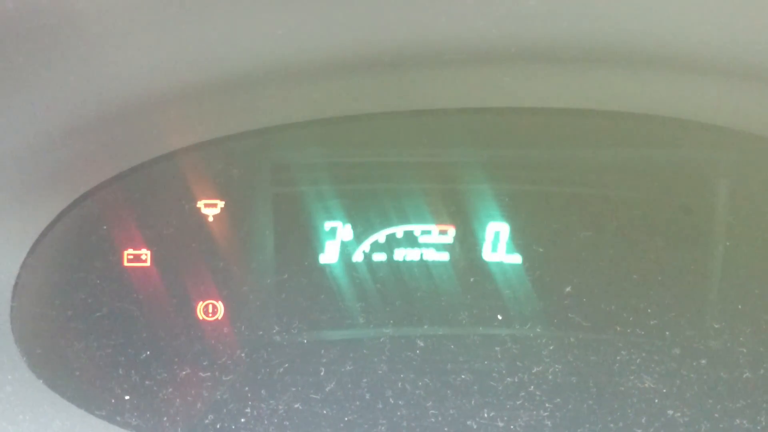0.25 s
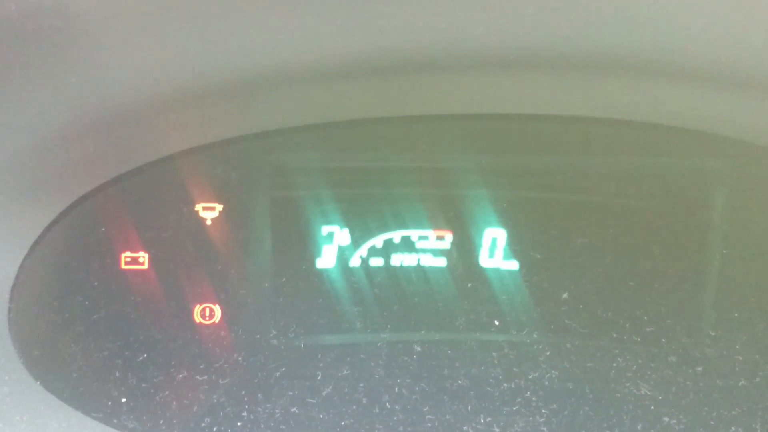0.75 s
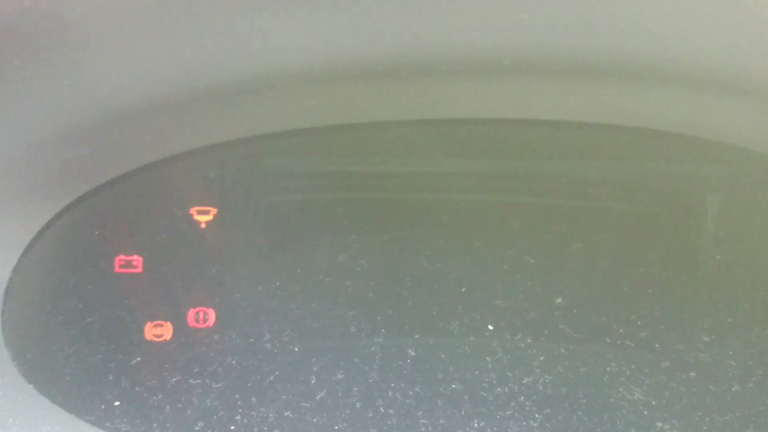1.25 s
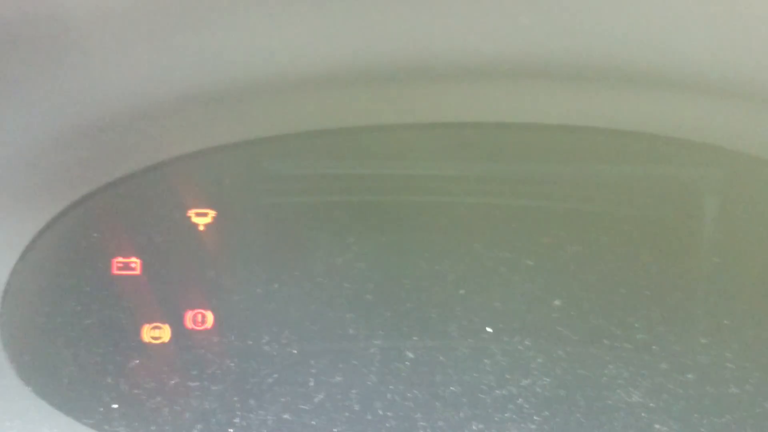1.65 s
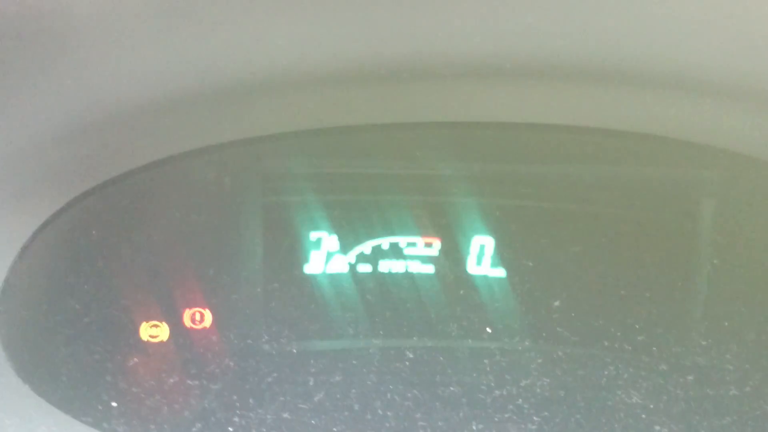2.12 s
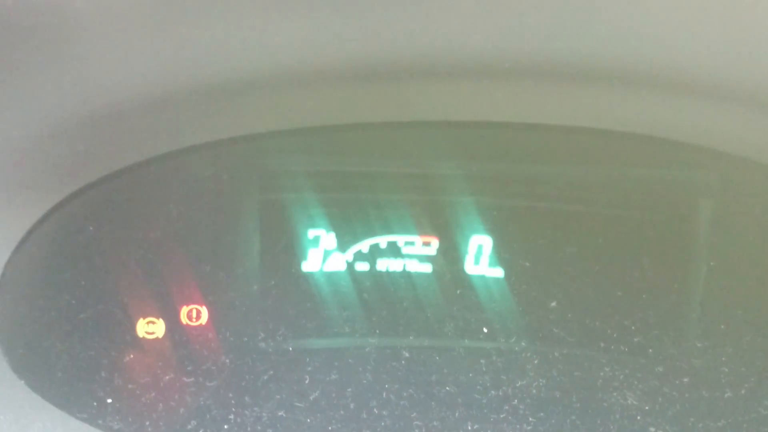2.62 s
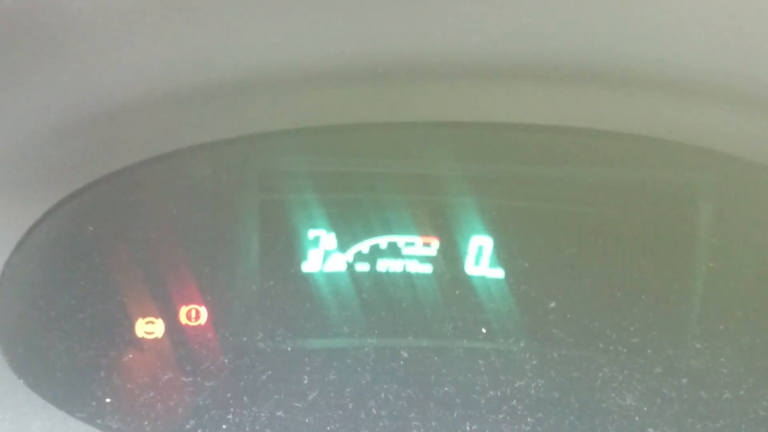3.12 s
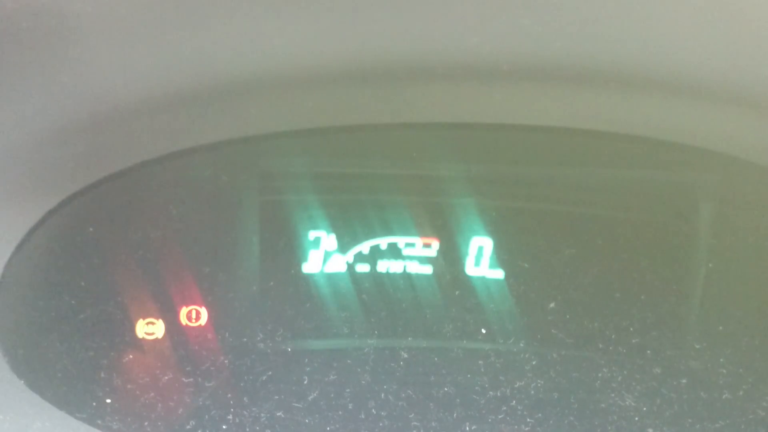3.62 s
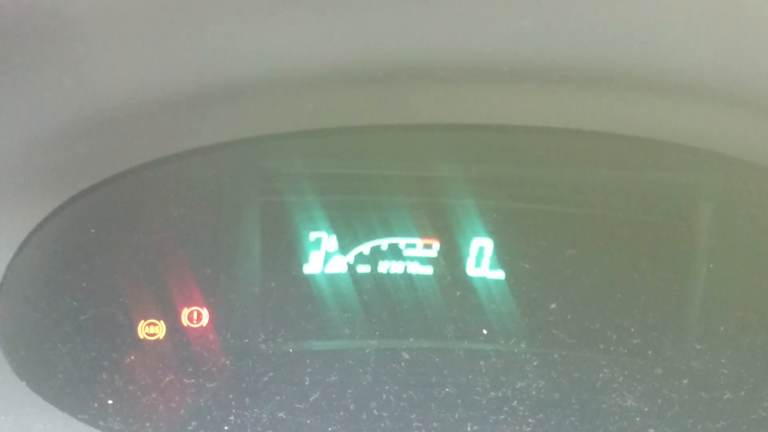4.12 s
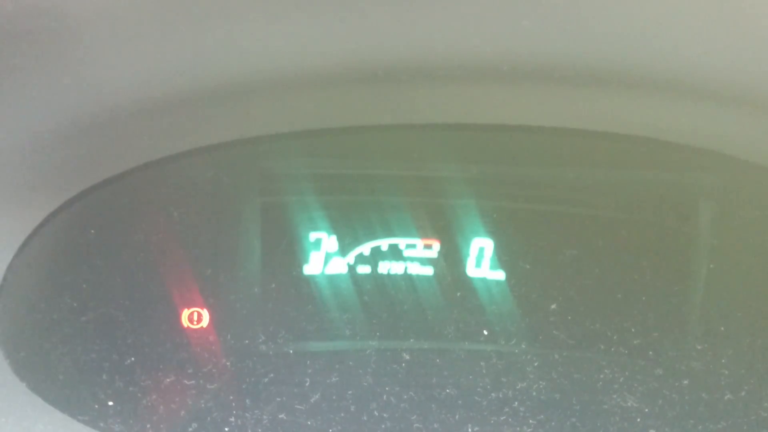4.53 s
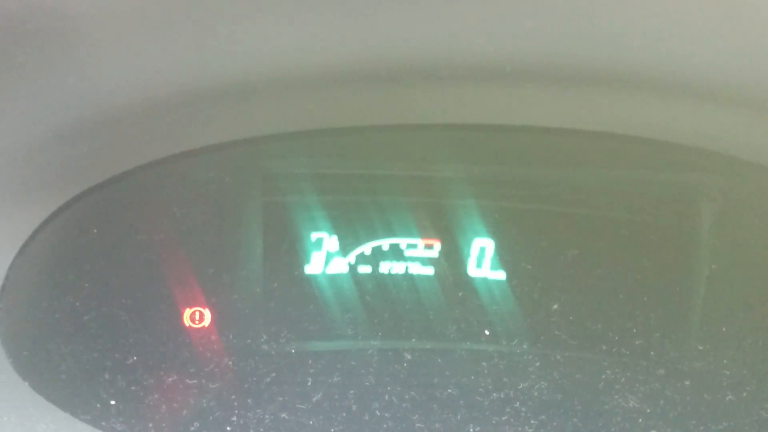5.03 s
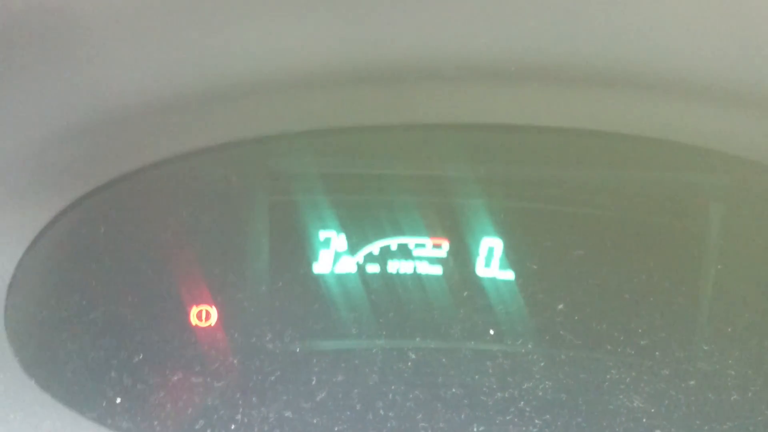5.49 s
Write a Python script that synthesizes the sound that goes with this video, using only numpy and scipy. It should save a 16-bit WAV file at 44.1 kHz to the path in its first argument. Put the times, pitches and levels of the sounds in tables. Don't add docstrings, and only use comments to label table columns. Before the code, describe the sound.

Inside a parked car, close stereo pickup from the driver's seat. At first only low distant traffic through glass, slight hiss and faint clothing rustle. From about 0.85 to 1.1 s the key turns with small dry metal clicks. At 1.1 s the starter meshes and grinds, heavy and slow at first, then in quicker growling pulses. Around 1.7 s the key springs back with a click and the diesel catches: a deep, uneven boom and shudder, strongest until about 2 s, settling by 2.5 s into a soft, muffled low idle. The shaking makes nearby keys jingle brightly from 1.8 to 2.3 s, with a loud plastic crack from the fob at 2.0 s. Further knocks on the column come near 2.6, 3.2, 3.8, 4.3 and 4.9 s, mostly fading, with tiny key clinks after them. Cloth brushes briefly around 3.1 s. Idle continues to the end near 5.8 s.

```python
import sys
import numpy as np
from scipy import signal
from scipy.fft import rfft, irfft, next_fast_len
from scipy.io import wavfile
from scipy.ndimage import uniform_filter1d

SR = 44100
rng = np.random.default_rng(int(sys.argv[2]) if len(sys.argv) > 2 else 0)


def rack_gain(trim_db):
    fader = np.asarray(trim_db, float)
    return 10 ** (fader / 20)


def pcm_store(signal):
    levels = np.round(np.clip(np.atleast_2d(signal), -1, 1) * 32767)
    wavfile.write(sys.argv[1], SR, levels.astype(np.int16).T)


N = 253944
SIZE = next_fast_len(N + SR // 4)
T = np.arange(N) / SR
F = np.fft.rfftfreq(SIZE, 1 / SR) + 1e-3
PLASTIC = 1 / (1 + 1j * F / 7000) ** 3

# [f/Hz, level/dB per Hz]
RUMBLE = [(60, -16), (100, 2), (140, -6), (180, -14), (210, -7.5), (260, -13.5), (300, -13.5), (450, -16),
          (620, -22.5), (700, -27.5), (1000, -35.5), (2500, -42.5)]
# [t/s, gear level/dB, load level/dB, hold/s, release/s]
STROKES = [
    (1.126, -54, -46, 0.026, 0.76),
    (1.242, -47.5, -43.5, 0.059, 0.071),
    (1.428, -43.5, -35.5, 0.028, 0.042),
    (1.545, -46.5, -31.5, 0.025, 0.049),
    (1.662, -44, -31.5, 0.016, 0.079),
    (1.759, -39.5, -43, 0.0017, 0.025),
]


def unit(x):
    return x / np.sqrt(np.mean(x ** 2))


def curve(table):
    return np.interp(T, *np.transpose(table))


def onset(start_s, length_s):
    return np.clip((T - start_s) / length_s, 0, 1)


def tone(hz):
    return np.sin(2 * np.pi * np.cumsum(hz) / SR)


def shape(x, gain):
    fade = x[..., :N - SIZE - 1:-1] * np.linspace(1, 0, SIZE - N)
    extended = np.concatenate([x, fade], axis=-1)
    return irfft(rfft(extended) * gain, SIZE)[..., :N]


def colour(points):
    hz, db = np.transpose(points)
    return rack_gain(np.interp(np.log(F), np.log(hz), db, left=-90, right=-90))


def band(hz, width):
    return 1j * F * width / (hz ** 2 - F ** 2 + 1j * F * width)


def body(peaks):
    return sum((-1) ** k * rack_gain(db) * band(hz, width) for k, (hz, width, db) in enumerate(peaks))


def modes(table):
    total = 0
    for k, (hz, db, t60) in enumerate(table):
        width = np.log(1000) / np.pi / t60
        total = total + (-1) ** k * rack_gain(db) * band(hz, width) * SR / (2 * np.pi * width)
    return total


def walk(rate):
    k = int(SR / rate)
    steps = np.repeat(rng.standard_normal(N // k + 1), k)
    return 1.308 * uniform_filter1d(uniform_filter1d(steps, k), k)[:N]


def grit(per_s, scatter_db):
    struck = rng.random(N) < per_s / SR
    return unit(struck * rng.standard_normal(N) * rack_gain(scatter_db * rng.exponential(size=N)))


def blows(times, db, length, bounces, loss_db=-14):
    out = np.zeros(N + SR)
    chance = rng.random((len(times), 3, 60))
    for s, d, span, (when, size, sign) in zip(times, db, length * np.ones(len(times)), chance):
        when = np.r_[0, when[:bounces]]
        size = np.r_[1, (size * np.sign(sign - .5))[:bounces]]
        np.add.at(out, (SR * (s + span * when)).astype(int), rack_gain(d + loss_db * when) * size)
    return out[:N]


def swells(times, db, attack, release, fall_db=20, hold=0):
    t = T[::32, None] - times
    away = np.maximum(-t / attack, 0) + np.maximum((t - hold) / release, 0)
    return np.interp(T, T[::32], np.linalg.norm(rack_gain(db - fall_db * away), axis=1))


def spread(gain, alike_hz):
    mid, side = rng.standard_normal((2, N))
    apart = shape(side, gain * np.clip(F / alike_hz, 0, 1))
    return unit(shape(mid, gain) + np.array([[1], [-1]]) * apart)


def stereo(x, wet_db, t60, lag_s=.0004):
    t = T[:int(.15 * SR)]
    tail = rng.standard_normal((2, len(t))) * rack_gain(-60 * t / t60) * (t > .0012)
    wet = signal.fftconvolve(x[None], tail / np.linalg.norm(tail[0]), axes=1)[:, :N]
    return np.array([np.roll(x, int(lag_s * SR)), x]) + rack_gain(wet_db) * wet


def shadowed(x, wet_db, t60):
    # [f/Hz, level/dB, phase/rad]
    detour = [(300, 0, 0), (750, -2, -1.6), (1100, -2, -1.0), (1950, 2, -3.1), (2500, 2, -6.1),
              (3050, 3, -4.9), (3600, 1, -6.3), (4200, 3, -6.6), (5000, -3, -7.8), (7000, -7, -7.8)]
    hz, db, turn = np.transpose(detour)
    left, right = stereo(x, wet_db, t60, 0)
    around = rack_gain(np.interp(F, hz, db)) * np.exp(1j * np.interp(F, hz, turn))
    return np.array([shape(left, around), right])


def quiet():
    # [f/Hz, level/dB per Hz]
    traffic = [(15, -62.5), (25, -44), (49, -4), (69, 2.5), (87, -5), (152, -16.5), (234, -12.5),
               (269, -18.5), (1000, -34.5), (1300, -69), (2200, -120)]
    # [t/s, level/dB, attack/s, release/s]
    moves = [
        (.05, -57, 1.1, 0.38),
        (2.7, -52.5, 2, 0.88),
        (3.12, -47, 0.071, 0.1),
        (3.3, -57, 0.34, 0.74),
        (4.5, -59.5, 8.6, 9.9),
    ]
    street = spread(colour(traffic), 700) * rack_gain(-64.5 + 4.5 + 1.2 * walk(5))
    cloth = unit(shape(rng.standard_normal((2, N)), band(4700, 520) + .5 * band(3480, 1352)))
    steady = rack_gain(-73)
    motion = np.hypot(steady, swells(*np.transpose(moves)))
    return street + cloth * motion * rack_gain(-7.5 + 1.65 * walk(24.02))


def lock():
    # [t/s, peak level/dB, left minus right/dB]
    detents = [
        (0.858, -33.5, -1),
        (0.976, -37.5, -2),
        (1.0017, -32, -1.5),
        (1.117, -37.5, 5),
        (1.3497, -44, 10),
        (1.7162, -26, 7),
        (1.7606, -34.5, -17),
    ]
    # [f/Hz, level/dB, t60/s]
    barrel = [(1140, -14.5, 0.02), (2420, -8.5, 0.0058), (2900, -9, 0.019), (3520, -2, 0.0086),
              (4300, -4, 0.0098), (4450, -3, 0.038), (5100, 4.5, 0.011)]
    # t/s, level/dB, f/Hz, t60/s
    spring = (1.352, -39, 4150, 0.03)
    s, db, pan_db = np.transpose(detents)
    sides = np.array([blows(s, db - 6 + k * pan_db / 2, 0.011, bounces=25) for k in (1, -1)])
    at, ping_db, ping_hz, t60 = spring
    ping = shape(blows([at], [ping_db], 0.011, bounces=4), modes([(ping_hz, 0, t60)]))
    metal = modes(barrel) + rack_gain(-23) * band(2400, 2400) ** 2
    return ping + shape(sides, metal * PLASTIC)


def starter():
    # [f/Hz, width/Hz, level/dB]
    housing = [(555, 63, -5.5), (785, 56, -1.5), (1070, 99, 0.5), (1670, 1280, -14), (2224, 180, -8.5),
               (2790, 342, -14), (4500, 1700, -14)]
    engage_s, freed_s = 1.11, 1.41
    whine_hz, sag_hz_per_s = 354.6, 400
    s, gear_db, load_db, hold, release = np.transpose(STROKES)

    meshed = np.cumsum(267 * (1 + 0.04 * walk(15))) / SR
    teeth = np.diff(np.floor(meshed), prepend=0) * rack_gain(0.84 * rng.standard_normal(N))
    bulkhead = 1 / (1 + (F / 5800) ** 8)
    grind = unit(shape(unit(teeth) + 1.5 * grit(3000, 3), body(housing) * bulkhead))

    drag = grit(970, 4.4)
    heavy = rack_gain(5.0) * unit(shape(drag, band(193.5, 50) ** 2 + band(268, 38) ** 2)) * onset(1.2, 0.073)
    free = rack_gain(4.0) * unit(shape(drag, band(300.3, 34) ** 2 + 0.67 * band(344.0, 33) ** 2))
    turned = onset(freed_s, .02)
    since = T - s[np.maximum(np.searchsorted(s, T) - 1, 0)]
    sag = sag_hz_per_s * np.clip(since, 0, .15) * (3.2 - 2.2 * turned)
    pitch = (whine_hz - sag).clip(225) * (1 + 0.022 * walk(59.96))
    whine = rack_gain(-2.0 + 4.0 * walk(49.7)) * tone(pitch) * onset(1.2, 0.065)
    growl = rack_gain(-1.5) * ((1 - turned) * heavy + turned * free) + whine

    gear = swells(s, gear_db + 0.5, 0.16 * release, release, 22, hold) * onset(engage_s, 0.002)
    load = swells(s + hold, load_db - 4.5, 0.032, release, 12.8) * (T < s[-1] + .03)
    return stereo(gear * grind, 1.0, 0.15) + stereo(load * growl, -3.5, 0.091, 0)


def engine():
    # [t/s, f/Hz]
    speed = [(1.7, 23.), (1.95, 26.), (2.11, 28.2), (2.3, 27.3), (2.5, 25.7), (3.5, 25.8), (5.76, 25.8)]
    # [t/s, roughness 0-1]
    unevenness = [(1.7, 1), (1.97, .7), (2.05, .35), (2.4, .3), (2.6, .08), (5.76, .07)]
    cylinder_db = [0., -3., 1.5, -.5]
    # [f/Hz, width/Hz, level/dB]
    panels = [(52.7, 11.5, 0.5), (73.3, 19.2, -6), (102, 6.9, -21.5), (130.9, 20, -13.5), (152.8, 11, -15),
              (207, 26, -25), (262, 23.8, -35.5)]
    sense = [1, -1, -1, 1, -1, -1, -1]
    # [t/s, level/dB]
    running_levels = [(1.69, -30), (1.79, -19.5), (1.93, -26), (1.994, -33), (2.04, -27.5), (2.27, -29.5),
                      (2.335, -37), (2.4, -36), (2.56, -36), (3.2, -34.5), (3.7, -35), (3.76, -38),
                      (3.85, -35.5), (5.55, -38.5), (5.65, -33.5), (5.72, -36.5), (5.76, -72)]
    # start/s, end/s
    loose_s = (1.72, 2.39)

    rough = curve(unevenness)
    turns = np.cumsum(curve(speed) * (1 + .05 * rough * walk(30))) / SR
    at = np.flatnonzero(np.diff(np.floor(turns)))
    pulses = np.zeros(N)
    uneven_db = 6 * rough[at] * rng.standard_normal(400)[:len(at)]
    pulses[at] = rack_gain(np.resize(cylinder_db, len(at)) + uneven_db)
    cabin = sum(k * rack_gain(db) * band(hz, w) for k, (hz, w, db) in zip(sense, panels))
    cabin = cabin * (1j * F / (1j * F + 30)) ** 2 / (1 + (F / 230) ** 4)
    firing = onset(1.7, .3) * unit(shape(pulses, cabin))

    sway = band(52, 22) ** 2 + .45 * band(74, 25) ** 2 + .12 * band(105, 40) ** 2 + .04 * band(145, 40) ** 2
    rocking = shape(rng.standard_normal(N), sway)
    rocking = rocking / np.sqrt(uniform_filter1d(rocking ** 2, size=SR // 14))

    s, gear_db, load_db, hold, release = np.transpose(STROKES)
    running = curve(running_levels)
    caught = onset(running_levels[0][0], 0.018)
    engaged = onset(1.11, 0.013)
    heave = np.hypot(caught * rack_gain(running), swells(s + hold, load_db, 0.013, release, 4.55))
    boom = heave * engaged * rack_gain(4.5 + 0.593 * walk(13))
    boom = boom * (firing + 1.68 * rough * rocking) / np.sqrt(1 + rough ** 2)
    loose = onset(loose_s[0], .03) * np.clip((loose_s[1] - T) / .03, 0, 1)
    boom = boom - .85 * loose * shape(boom, band(57, 40))

    combustion = caught * rack_gain(-53 + 0.24 * (running - running[-1]))
    cranked = engaged * swells(s[:-1] + hold[:-1], gear_db[:-1] + 6.5, 0.047, release[:-1], 17.2)
    gate = (.8 + .6 * np.exp(-(turns % 1) / .2)) * rack_gain(1.2 * walk(12))
    gate = uniform_filter1d(gate, size=SR // 300)
    churn = spread(colour(RUMBLE) / (1 + (150 / F) ** 4), 801.7)
    return boom + rack_gain(1.5) * gate * (combustion * spread(colour(RUMBLE), 1100) + cranked * churn)


def fob():
    # [t/s, peak level/dB, second bounce/dB]
    knocks = [
        (1.7147, -34, -23),
        (1.7608, -32.5, -22),
        (2.0203, -6, -3),
        (2.08, -42, 2),
        (2.592, -19.5, 10),
        (3.182, -16, -6),
        (3.7603, -21.5, 2),
        (4.334, -26, -21),
        (4.362, -39, -19.5),
        (4.915, -33, -22),
    ]
    # [f/Hz, level/dB, t60/s]
    column = [(578, -8, .02), (790, -6, 0.03), (1192, -7, 0.014), (1596, -6, 0.03), (1844, -0.5, 0.028),
              (2207, -1, 0.018), (2626, -11, .03), (2920, -15, 0.017), (3490, -3.5, 0.029),
              (4105, -10, 0.023), (4640, -6.5, 0.024), (4980, -9, 0.028), (5380, 3, 0.019),
              (6700, -13.5, 0.017)]
    # [t/s, level/dB, hold/s, f/Hz]
    tocks = [(1.713, -45, .008, 1140), (1.76, -41, 0.0079, 1150), (2.024, -39, 0.005, 1008),
             (2.035, -27.5, 0.0061, 1130), (2.084, -44.5, 0.0075, 1110), (2.593, -30, 0.0055, 1127),
             (2.606, -32.5, 0.0064, 1131), (3.187, -26.5, 0.0043, 1143), (3.192, -30.5, 0.0116, 1120),
             (3.764, -30.5, 0.013, 1133), (4.336, -41.5, 0.01, 1147), (4.365, -49, .006, 1122),
             (4.916, -42, 0.0074, 1150)]
    s, db, again_db = np.transpose(knocks)
    at, tock_db, hold, tock_hz = np.transpose(tocks)
    crack = blows(s, 1.75 * db + 20.5, 0.0048, bounces=14, loss_db=-6.5)
    hit = blows(s, 0.97 * db - 8.5, .03, bounces=14, loss_db=-24.0)
    again = blows(s + 0.019, db + again_db - 15.5, 0.0079, bounces=5)
    soft = 1 / (1 + 1j * F / 1500) ** 2
    shell = (1j * F / (1j * F + 400)) ** 2 * modes(column)
    edge = band(5760, 1299) ** 2 - band(3530, 1170) ** 2
    impact = shape(crack, edge) + shape(hit, shell * PLASTIC) + shape(again, shell * soft)
    pitch = tock_hz[np.maximum(np.searchsorted(at - .004, T) - 1, 0)] * (1 + 0.0225 * walk(200))
    tock = swells(at, tock_db, 0.003, 0.008, 23.96, hold) * rack_gain(1.5 * walk(200)) * tone(pitch)
    thump = swells(s + 0.004, .85 * db - 22, 0.008, 0.065) * spread(colour(RUMBLE), 774)
    rub = 1.7 * band(795, 520) ** 2 - 1.3 * band(1950, 1300) ** 2 + 0.79 * band(3300, 1600) ** 2
    scrape = swells(s, db - 18.0, .001, 0.022, 21.0, 0.0059) * unit(shape(grit(5000, 1.1), rub))
    return thump + shadowed(tock + scrape + impact, -8.0, 0.041)


def lurch():
    # [t/s, bounce level/dB, pitching level/dB, attack/s, release/s]
    throws = [(1.716, -33, -38, .05, .06), (1.754, -32, -22, .04, .06), (1.79, -19, -29, .06, .1),
              (1.855, -24, -18, .06, .06), (1.905, -24, -29, .04, .08), (1.945, -19, -22, .07, .04),
              (2.03, -26, -28, .04, .12), (2.1, -29, -38, .1, .12), (2.19, -29, -34, .1, .12),
              (2.264, -25, -30, .1, .08), (2.362, -33, -31, .03, .06)]
    # [t/s, f/Hz]
    bounce = [(1.7, 48.02), (1.8, 47.36), (1.88, 49.4), (1.96, 55), (2.031, 56), (2.16, 54.5), (2.36, 53)]
    pitching = [(1.7, 82.33), (1.76, 78.5), (1.82, 71.4), (1.9, 70.6), (1.96, 63.5), (2.3, 64.9),
                (2.37, 71.6)]
    s, bounce_db, pitch_db, attack, release = np.transpose(throws)
    swing = sum(swells(s, db + 0.53, attack, release) * tone(curve(hz))
                for db, hz in ((bounce_db, bounce), (pitch_db, pitching)))
    return 1.9 * swing + shape(3.0 * swing ** 2, band(125, 90.4) ** 2)


def keys():
    # [t/s,
    # tick level/dB, long key level/dB, short key level/dB, dull clack level/dB]
    clinks = [(1.7175, -35, -81, -83, -41), (1.761, -35, -66.5, -64, -34.5), (1.7805, -13, -55, -40, -31),
              (1.814, -27, -52.5, -36, -23), (1.835, -23, -48, -49, -24), (1.872, -3, -48, -35, -27),
              (1.8845, -9, -51.5, -34, -32), (1.9195, -40, -68, -59, -27), (1.9245, -21, -29, -36.5, -28),
              (1.954, -10.5, -43.5, -40.5, -24), (2.0057, -33, -34, -42, -18.5),
              (2.025, 2, -43, -21.5, -8.5), (2.042, -10.5, -44.5, -33, -19.5),
              (2.0785, -14.5, -36.5, -31.5, -23.5), (2.147, -8.5, -50.5, -37, -36),
              (2.1596, -4, -48, -29.5, -26), (2.1888, -2.5, -51.5, -25.5, -40.5),
              (2.203, -11.5, -54, -29.5, -35.5), (2.2536, -24, -46.5, -60.5, -37),
              (2.2845, -14, -64.5, -49, -32), (2.3134, -25, -28.5, -50, -35),
              (2.4056, -18.5, -40.5, -60, -29.5), (2.4653, -19.5, -73, -58, -40),
              (2.4975, -33, -70, -62, -39), (2.592, -18, -38, -47, -29)]
    # [t/s, tick level/dB, ringing level/dB, clack level/dB]
    swings = [(2.6348, -27, -60, -34.5), (2.7194, -53, -89, -31), (2.7503, -18, -54, -33.5),
              (2.812, -60, -72, -35), (2.8326, -28, -61, -34), (3.0279, -48.5, -67, -46),
              (3.0716, -62, -68, -46.5), (3.183, -23.5, -77, -47), (3.1969, -38, -50, -27),
              (3.2305, -24, -51, -31.5), (3.3173, -27.5, -61, -42), (3.7645, -29, -55, -29),
              (3.7967, -38, -56, -41), (3.812, -44, -64, -44), (3.861, -31, -55, -43.5),
              (4.3395, -62.5, -59, -41), (4.3694, -34, -60, -37.5), (4.4522, -34, -68, -48),
              (4.9561, -47, -73, -49), (5.0315, -45.5, -70, -52)]
    # [t/s, level/dB, length/s]
    jolts = [(1.782, -33, .008), (1.815, -42.5, 0.027), (1.847, -44, .02), (1.874, -30.5, .025),
             (1.924, -28.5, 0.011), (1.94, -38.5, 0.013), (1.952, -24, .004), (1.965, -34.5, 0.032),
             (2.001, -36, 0.01), (2.02, -26.5, 0.025), (2.04, -18, .025), (2.062, -23, .02),
             (2.074, -31.5, 0.011), (2.105, -39, .02), (2.147, -41, 0.013), (2.16, -36, .012),
             (2.182, -33, .012), (2.193, -25, 0.014), (2.205, -40, 0.022), (2.28, -38, 0.0089),
             (2.4, -55, .012), (2.4646, -54, .01), (2.4975, -58, .01), (2.5714, -58, 0.011),
             (2.596, -51, .02)]
    # [t/s, bright level/dB, dull level/dB, attack/s, release/s]
    bursts = [(1.786, -53, -34, 0.013, 0.2), (1.848, -37.5, -36.5, 0.056, 0.078),
              (1.883, -32, -39, 0.018, 0.055), (1.921, -45, -37, 0.05, 0.16),
              (1.985, -44, -44, 0.036, 0.063), (2.049, -30, -34, 0.093, 0.13),
              (2.149, -31, -48, 0.0039, 0.073), (2.204, -26, -31, 0.063, 0.041),
              (2.258, -45.5, -46, 0.083, 0.073), (2.405, -75, -56, 0.0058, 0.49),
              (2.55, -62, -60, 0.24, 0.19), (2.623, -40.5, -35, 0.024, 0.032),
              (2.733, -88, -69, 0.036, 0.015), (2.759, -68, -87, 0.029, 0.021),
              (2.842, -49, -46, 0.033, 0.033)]
    # [f/Hz, level/dB, t60/s]
    long_key = [(13360, -2, .06), (14150, -3.5, .06), (15200, 0, .1)]
    short_key = [(14370, 2, 0.059), (14330, -5, .03), (12510, -12, 0.048), (9630, -14, .025),
                 (11420, -19.5, 0.034)]
    key_ring = [(15460, 7, 0.024), (15470, 2.5, 0.044), (15220, -1.5, .025), (15715, -4.5, .02),
                (15200, -1, 0.0303)]
    heads = [(3760, -46.5, .012), (4520, -41.5, .014), (5200, -38.5, 0.02), (6600, -48.5, .012)]

    s, db, long_db, short_db, dull_db = np.transpose(clinks)
    jolt, ring_db, jolt_s = np.transpose(jolts)
    late, late_db, light_db, late_dull_db = np.transpose(swings)
    brief = np.r_[np.ones(len(s)), np.full(len(late), .6)]
    s, db, dull_db = np.r_[s, late], np.r_[db, late_db], np.r_[dull_db, late_dull_db]
    long_db, short_db = np.r_[long_db, light_db - 13], np.r_[short_db, light_db - 5]
    ring_db = np.r_[ring_db, light_db + 2.5]
    jolt, jolt_s = np.r_[jolt, late], np.r_[jolt_s, np.full(len(late), 0.0098)]

    ringing = shape(blows(s, long_db + 10.5, .003, bounces=2), modes(long_key))
    ringing = ringing + shape(blows(s, short_db + 10.5, .02, bounces=12), modes(short_key))
    ringing = ringing + shape(blows(jolt, ring_db, jolt_s, bounces=40, loss_db=-12), modes(key_ring))

    ticks = np.array([blows(s, db - 6.0, 0.028 * brief, bounces=50) for _ in range(2)])
    tick = shape(ticks, band(11800, 4700) ** 2)
    thud = modes(heads) + 0.85 * band(4730, 1800) ** 2 - 0.19 * band(6920, 1590) ** 2
    thud = thud + 0.12 * band(3960, 3000) ** 2 - 0.17 * band(1900, 970) ** 2
    clacks = np.array([blows(s, dull_db + 11.5, 0.022 * brief ** .5, bounces=50) for _ in range(2)])
    clack = shape(clacks, thud)

    shake = np.array([grit(2000, 2), grit(2000, 2)]) * rack_gain(4.2 * walk(70)) * (T > clinks[1][0])
    bright = unit(shape(shake, band(14300, 6580) ** 2))
    bright = bright + 0.8 * unit(shape(shake, modes(key_ring)))
    bright = bright + 0.3 * unit(shape(shake, band(6250, 1860) ** 2))
    at, bright_db, low_db, attack, release = np.transpose(bursts)
    chatter = swells(at, bright_db, attack, release) * bright
    chatter = chatter + swells(at, low_db, attack, release) * unit(shape(shake, thud))

    echoed = stereo((tick + clack)[0], 13.3, 0.021) * rack_gain(-9.0)
    return stereo(ringing, -22, 0.035) + tick + clack + chatter + echoed


def scene():
    return quiet() + lock() + starter() + engine() + fob() + lurch() + keys()


def band_limit(x):
    return signal.sosfilt(signal.butter(12, 17130, fs=SR, output="sos"), x)


def record(dry):
    # [f/Hz, level/dB]
    ports = [(60, -4), (200, -5), (700, -2), (2400, -2), (5000, -4.5), (9000, 5), (12000, -11),
             (13500, -15), (15500, -17)]
    # [f/Hz, level/dB per Hz]
    hiss_colour = [(410, 3.5), (700, -8), (831, -9.5), (1130, 0), (1240, -5), (1770, -2), (2490, -0.5),
                   (4890, 0), (7460, -16), (15200, -10.5), (15900, -14), (16500, -37)]
    port = colour([(0.96, ports[0][1])] + ports + [(SR, ports[-1][1])])
    left = shape(dry[0], 1j * F / (1j * F + 80) * port)
    hiss = unit(shape(rng.standard_normal((2, N)), colour(hiss_colour))) * rack_gain(-69.5 + 2.0)
    rounded = np.tanh(np.array([left, dry[1]]) + hiss)
    top = signal.ellip(10, .3, 70, 15700, fs=SR, output="sos")
    return band_limit(1.245 * signal.sosfilt(top, rounded))


dry = scene()
out = record(dry)
pcm_store(out)
```